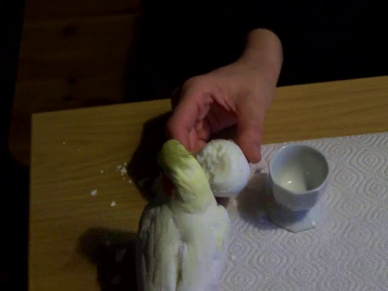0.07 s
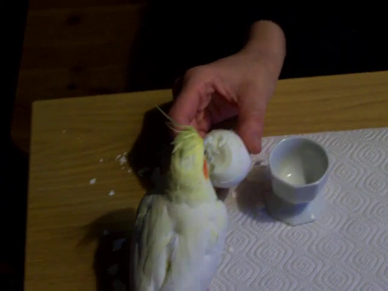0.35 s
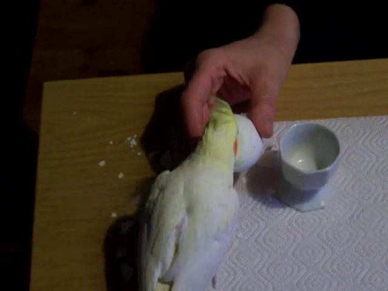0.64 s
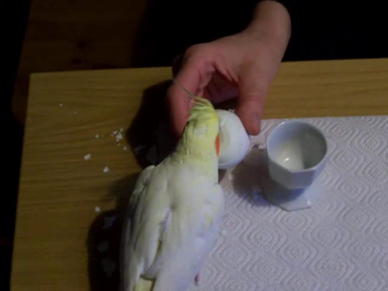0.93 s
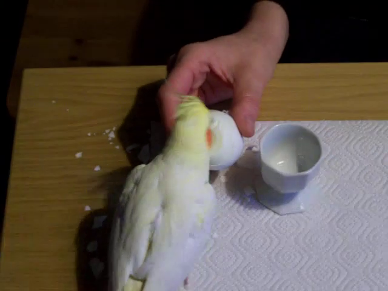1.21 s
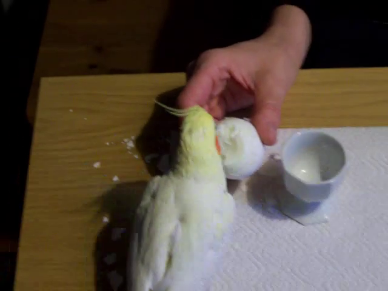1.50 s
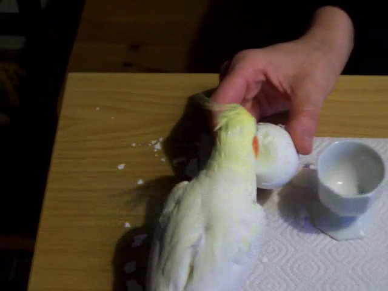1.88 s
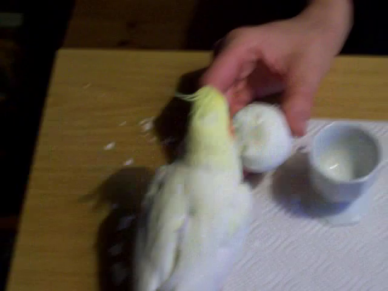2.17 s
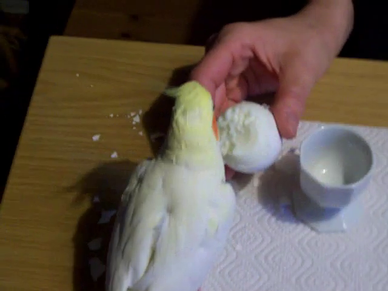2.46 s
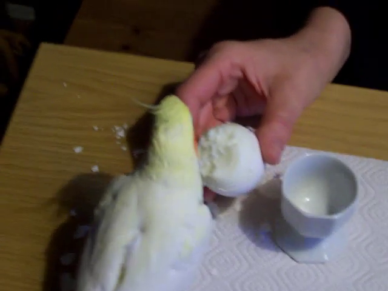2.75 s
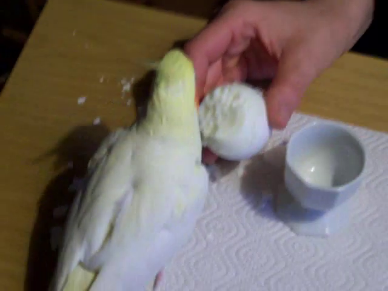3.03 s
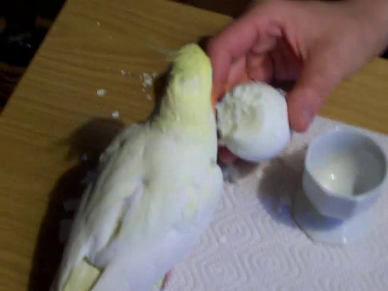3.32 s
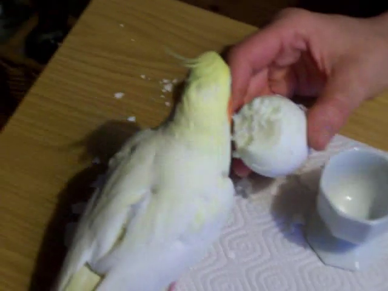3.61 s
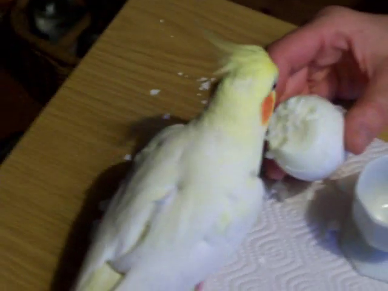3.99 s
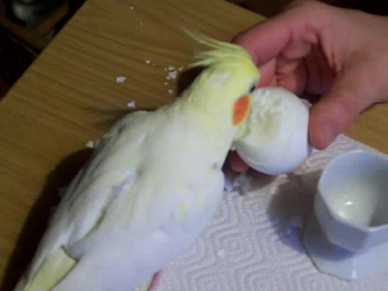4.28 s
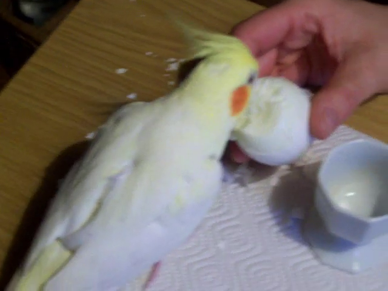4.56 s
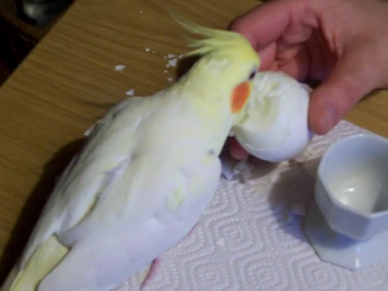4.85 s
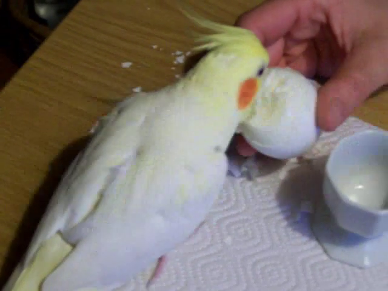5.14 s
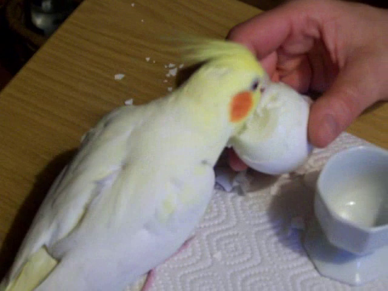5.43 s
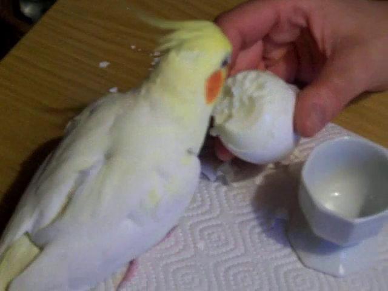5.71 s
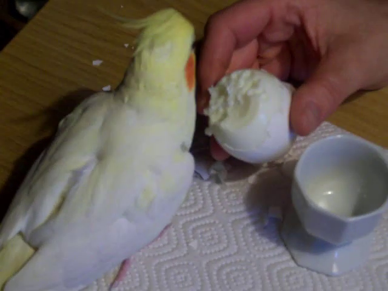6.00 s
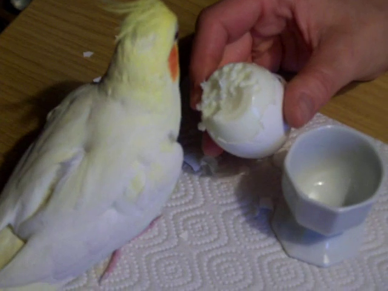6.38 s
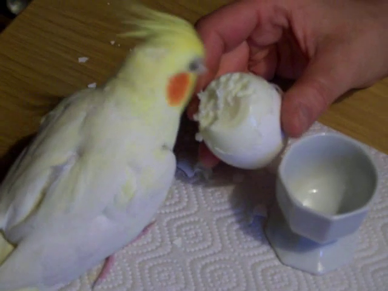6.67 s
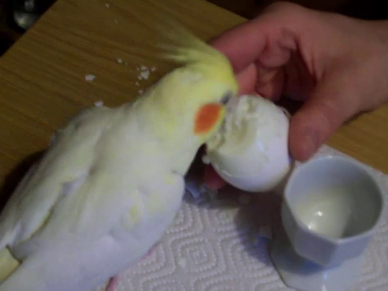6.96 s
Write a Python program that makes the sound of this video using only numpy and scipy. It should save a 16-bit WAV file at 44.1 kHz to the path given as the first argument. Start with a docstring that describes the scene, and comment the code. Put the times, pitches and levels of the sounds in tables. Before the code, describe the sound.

A small parrot nibbles a boiled egg, with faint irregular beak ticks, a few knocks and one sharp shell crack over quiet room hiss.

```python
"""A small parrot nibbles a boiled egg held over a wooden table in a small, quiet room. Under it all lie
room tone and the hiss and thin whine of a camera, whose lens motor whirs for the first two seconds.
The beak bumps the egg and ticks on its shell; then come hollow pops, pecks that knock through to the
table (loudest at 3 s) and soft rubs of feathers and fingers. At 4.2 s the beak slips and clacks shut.
Just after 5 s it grinds along the shell and snaps a bit off; a few faint pecks follow."""
import sys
import numpy as np
from scipy import signal
from scipy.fft import rfft, irfft, next_fast_len
from scipy.io import wavfile
from scipy.ndimage import map_coordinates

SR = 44100
rng = np.random.default_rng(int(sys.argv[2]) if len(sys.argv) > 2 else 0)


def wav_record(signal):
    """Record a signal, one row per channel, as 16-bit PCM in the file named by sys.argv[1]."""
    frames = np.transpose(np.atleast_2d(signal))
    bounded = np.clip(frames, -1, 1)
    # unit amplitude maps onto the largest positive 16-bit level
    quanta = np.round(bounded * 32767).astype(np.int16)
    wavfile.write(sys.argv[1], SR, quanta)


N = 308386
TIME = np.arange(N) / SR
HIT_SAMPLES = 8192
HIT_HZ = np.fft.rfftfreq(HIT_SAMPLES, 1 / SR)
HIT_AGE = np.arange(HIT_SAMPLES) / SR

# colour of the room tone and hiss (frequency [Hz], gain [dB])
AIR_EQ = [(12, -31), (20, -3), (37, -9), (114, -8), (146, -12), (178, -6.5), (340, -8), (405, -4),
          (532, -10), (812, -11.5), (874, -17), (1090, -14.5), (1300, -15.5), (2960, -22), (7600, -23.5),
          (9880, -51), (16700, -120)]
# resonances of the room's hum (frequency [Hz], width [Hz], gain [dB])
HUM_MODES = [(118, 18, -3), (435, 70, -1), (827, 13, -3), (1150, 70, -12), (1299, 18, -3.5),
             (1660, 40, -11), (4610, 90, -11)]
# slow fader ride on the room tone, taken about its mean (time [s], level [dB])
TONE_RIDE = [(0.0, -54), (0.56, -55.5), (1.36, -54), (3.62, -55.5), (4.15, -54), (6.99, -56.5)]
# partials of the electronics' whine (frequency [Hz], relative level [dB])
WHINE_PARTIALS = [(7837, -71), (7867, -72), (7897, -74), (8103, -73), (8133, -71.5), (8163, -71.5)]
# the lens motor hunts for focus (start [s], length [s], level [dB])
FOCUS_RUNS = [(.285, 0.065, -53), (.495, 0.024, -54), (.53, .12, -63.5), (.845, 0.016, -54.5),
              (.945, 0.11, -58.5), (1.185, .16, -57.5), (1.565, 0.152, -54), (1.768, 0.016, -49.5),
              (2.035, 0.059, -56)]
# the lens housing (frequency [Hz], width [Hz], gain [dB])
LENS_MODES = [(1725, 200, -1), (2373, 260, -8.5), (3440, 470, -14.5), (5220, 220, -9), (7180, 280, -14)]
# the blunt side of the beak bumps the egg (time [s], level [dB])
BUMP_CUES = [(0.35, -53), (1.8333, -50.5), (2.4703, -55), (2.946, -50), (3.3264, -50), (3.5293, -44),
             (4.851, -52), (4.949, -41)]
# the beak's tip ticks on a spot of shell (time [s], level [dB], ring [Hz], ring width [Hz])
TICK_CUES = [(0.7215, -50.5, 5200, 3200), (0.8543, -51, 1680, 2200), (1.5678, -49.5, 1870, 2800),
             (1.6464, -46, 1650, 900), (1.8907, -44.5, 3200, 2600), (2.1849, -35, 5500, 5400),
             (2.4701, -56, 1900, 2200), (3.0441, -40.5, 4700, 4000), (3.1404, -47.5, 5030, 2000),
             (3.174, -52, 5000, 4000), (3.288, -47.5, 6500, 1500), (3.3267, -51.5, 3290, 3800),
             (3.5161, -48.5, 1700, 2400), (3.9485, -50.5, 2200, 3400), (4.0796, -53, 3800, 4000),
             (4.1068, -50, 1500, 1500), (4.2303, -52.5, 4600, 3200), (4.4103, -51.5, 1700, 1400),
             (4.6098, -43.5, 3800, 2400), (4.761, -38, 6000, 1400), (4.9744, -47, 4500, 3400),
             (5.001, -45, 4300, 3400), (5.0081, -46.5, 5400, 3800), (5.0308, -49.5, 3000, 2600),
             (5.0567, -39, 3500, 2200), (5.0706, -42, 2000, 1400), (5.0891, -41, 3000, 2000),
             (5.0998, -40.5, 3000, 1600), (5.1123, -40.5, 3070, 1300), (5.1318, -48, 2700, 1300),
             (5.1404, -53, 1700, 1790), (5.3459, -48.5, 1300, 1000), (5.3625, -49, 2600, 1200),
             (6.4195, -48, 1700, 2400), (6.7969, -53.5, 1700, 1400)]
# hollow pops of the beak (time [s], level [dB])
POP_CUES = [(1.8745, -52), (1.8897, -41.5), (4.4902, -53), (4.609, -33)]
# the beak's cavity (frequency [Hz], width [Hz], gain [dB])
CAVITY_MODES = [(2225, 102, 1.5), (4170, 250, -9.5)]
# pecks that reach the table (time [s], level [dB])
KNOCK_CUES = [(1.892, -44.5), (2.164, -46.5), (3.0442, -24), (3.9470, -40.5), (4.952, -48.5), (6.419, -51)]
# the wooden table (frequency [Hz], width [Hz], gain [dB])
TABLE_MODES = [(445, 32, 3), (560, 230, -26), (642, 36, -11), (1104, 72, -16), (1320, 67, -27.5),
               (1756, 50, -18), (1910, 150, -27.5)]
# feathers and fingers rub (start [s], length [s], level [dB])
RUB_CUES = [(2.46, 0.11, -57.5), (2.66, 0.051, -56), (3.06, 0.035, -54), (3.31, 0.12, -58),
            (3.76, 0.091, -60), (4.05, 0.061, -64)]
# colour of the rubbing (frequency [Hz], gain [dB])
FEATHER_EQ = [(200, -31), (900, 4), (2000, -1.5), (5500, 2), (8000, -7.5)]
# the beak clacks shut and rebounds (time [s], level [dB], contact length [s])
CLACK_CUES = [(4.2097, -25, 0.0021), (4.216, -38.5, 0.0026)]
# the beak's two halves (frequency [Hz], width [Hz], gain [dB])
BEAK_MODES = [(434, 270, -17.5), (770, 105, -8.5), (1150, 99, -7.5), (1534, 110, -1), (1810, 160, -0.5),
              (2170, 164, -2), (2400, 180, -6), (2970, 220, -5.5), (3210, 150, -6), (3640, 290, -14)]
# the scraped shell (frequency [Hz], width [Hz], gain [dB])
SCRAPE_MODES = [(260, 140, -3), (1800, 250, 0), (2230, 170, 0), (2800, 220, 0.5), (3500, 260, -6),
                (4230, 87, 1), (5270, 640, -15), (6300, 800, -12.5), (7030, 210, -6.5)]
# the shell breaks (time [s], level [dB], tearing time [s], low-pass cutoff [Hz])
CRACK_CUES = [(5.2718, -19, 0.0034, 8000), (5.2779, -42, 0.0042, 2600), (5.28, -33, 0.00493, 4270),
              (5.3687, -36, 0.004, 3100)]
# the breaking shell (frequency [Hz], width [Hz], gain [dB])
SHELL_MODES = [(367, 580, -13), (675, 160, -3), (1277, 116, -2), (1720, 44, 1), (1960, 81, -1),
               (2250, 126, 2), (2730, 210, -1), (3080, 130, -10), (3370, 190, -4.5), (4140, 250, 6.5),
               (4900, 220, -15), (4810, 170, -7), (6000, 1400, -11), (6920, 770, -9)]
# reverb of the small room (frequency [Hz], time to fall 60 dB [s])
ROOM_DECAY = [(200, 0.93), (2000, 0.31), (8000, 0.3)]
# treble roll-off of the microphone (frequency [Hz], gain [dB])
MIC_EQ = [(7200, 0), (8050, -4), (8400, -14), (8800, -26), (9100, -40)]


def amp(db):
    return 10 ** (np.asarray(db) / 20)


def unit(x):
    return x / np.sqrt(np.mean(x ** 2) + 1e-20)


def along(points, hz):
    """Read a curve of (frequency [Hz], value) points on a log axis."""
    f, v = np.transpose(points)
    return np.interp(np.log(hz + 1), np.log(f + 1), v)


def filtered(x, response):
    """Run a track through a frequency response."""
    size = next_fast_len(N + SR // 2)
    return irfft(rfft(x, size) * response(np.fft.rfftfreq(size, 1 / SR)), size)[:N]


def resonances(modes, f):
    """Response of a bank of resonators with alternating polarity."""
    return sum((-1) ** k * amp(db) * 1j * f * width / (hz * hz - f * f + 1j * f * width)
               for k, (hz, width, db) in enumerate(modes))


def minimum_phase(gain):
    """A filter with this gain curve and no pre-ring."""
    cepstrum = irfft(np.log(np.maximum(gain, 1e-6)))
    cepstrum[1:HIT_SAMPLES // 2] *= 2
    cepstrum[HIT_SAMPLES // 2 + 1:] = 0
    return np.exp(rfft(cepstrum))


def noise(response):
    """Coloured noise of rms 1."""
    return unit(filtered(rng.standard_normal(N), response))


def crackle(per_s):
    """Random clicks of random size."""
    return (rng.random(N) < per_s / SR) * rng.standard_normal(N)


def contact(length_s):
    """Spectrum of a burst of tiny slips: even over frequency, ragged in time."""
    window = np.exp(-(HIT_AGE / max(length_s, 1e-4)) ** 2)
    burst = rng.standard_normal(HIT_SAMPLES) * window
    for _ in range(8):
        whitened = irfft(np.exp(1j * np.angle(rfft(burst))))
        burst = whitened * np.sqrt(window)
    return rfft(burst)


def place(track, time_s, db, hit):
    """Lay in a hit with the energy of 10 ms at this level."""
    start = max(round(time_s * SR), 0)
    hit = amp(db) * hit * np.sqrt(.01 * SR / np.sum(hit ** 2))
    track[start:start + HIT_SAMPLES] += hit[:N - start]


def gate(cues, fade_s):
    """Envelope that fades in and out for each (start [s], length [s], level [dB]) cue."""
    return sum(amp(db) * np.clip(np.minimum(TIME - start, start + length - TIME) / fade_s + .5, 0, 1)
               for start, length, db in cues)


def background():
    """The bed: slowly drifting room tone and hum, steady hiss and the whine of the electronics."""
    times, ride_db = np.transpose(TONE_RIDE)
    drift = amp(np.interp(TIME, times, ride_db) - np.mean(ride_db))
    air = amp(-53) * noise(lambda f: amp(along(AIR_EQ, np.minimum(f, 7000))))  # flat above 7 kHz
    room_tone = filtered(air, lambda f: 1 / (1 + (f / 2000) ** 2))
    hiss = air - room_tone
    hum = amp(-62.5) * noise(lambda f: resonances(HUM_MODES, f))
    whine = sum(amp(db) * np.sin(2 * np.pi * (hz * TIME + rng.random())) for hz, db in WHINE_PARTIALS)
    return hiss + drift * (room_tone + hum) + amp(3) * whine


def lens_whirs():
    """Short runs of the focus motor rattle finely in the lens housing."""
    whir = filtered(crackle(per_s=2500), lambda f: resonances(LENS_MODES, f))
    return gate(FOCUS_RUNS, fade_s=0.011) * unit(whir)


def egg_body(hz=587, width_hz=550):
    """Spectrum of the dead thud of the soft, heavily damped egg."""
    return resonances([(hz, width_hz, 0)], HIT_HZ) ** 2


def egg_bumps():
    """A blunt push thuds in the egg without ringing the shell."""
    out = np.zeros(N)
    for time_s, db in BUMP_CUES:
        place(out, time_s, db, irfft(contact(length_s=.0045) * egg_body()))
    return out


def nibble_cues(per_s=2.8, db=-59.5, spread_db=2, lowest_hz=1480, octaves=2.2):
    """Faint random touches of the beak, in the columns of TICK_CUES."""
    when, size, spot = rng.random((int(per_s * N / SR), 3)).T
    ring_hz = lowest_hz * 2 ** (octaves * spot)
    return list(zip(when * N / SR, db + spread_db * (2 * size - 1), ring_hz, .8 * ring_hz))


def shell_ripple(depth_db=3.0, spacing_hz=331.4):
    """Random peaks and dips: every spot on the shell has its own resonances."""
    knots = rng.standard_normal(128)
    return amp(depth_db * map_coordinates(knots, [HIT_HZ / spacing_hz], mode="mirror"))


def shell_ticks(chatter_db=1.5, chatter_t60_s=.035, chatter_cutoff_hz=2100):
    """The beak's tip touches and chatters, ringing a spot of shell and nudging the egg."""
    out = np.zeros(N)
    for time_s, db, ring_hz, width_hz in TICK_CUES + nibble_cues():
        brightness = ring_hz / 2000
        contact_s = 0.0044 / brightness ** .6  # brighter ticks are shorter
        thud_db = db - 5.5 - 9 * np.log2(brightness)  # and push the egg less
        slips = rfft(unit(irfft(contact(contact_s))))
        rattle = unit(rng.standard_normal(HIT_SAMPLES) * amp(-60 * HIT_AGE / chatter_t60_s))
        chatter = rfft(rattle) / (1 + 1j * HIT_HZ / chatter_cutoff_hz)
        touch = slips + amp(chatter_db) * chatter
        colour = np.abs(resonances([(ring_hz, width_hz, 0)], HIT_HZ)) * shell_ripple()
        place(out, time_s, db, irfft(touch * minimum_phase(colour)))
        place(out, time_s, thud_db, irfft(touch * egg_body()))
    return out


def beak_pops(attack_s=0.0013):
    """The beak parts and its cavity swells into a brief, hollow note."""
    out = np.zeros(N)
    swell = (1 - np.exp(-HIT_AGE / attack_s)) ** 2
    for time_s, db in POP_CUES:
        place(out, time_s, db, irfft(resonances(CAVITY_MODES, HIT_HZ)) * swell)
    return out


def table_knocks():
    """A peck carries through and rings the wood of the table."""
    out = np.zeros(N)
    for time_s, db in KNOCK_CUES:
        place(out, time_s, db, irfft(contact(length_s=0.0011) * resonances(TABLE_MODES, HIT_HZ)))
    return out


def feather_rubs():
    """Fibres catch and slip as the bird and the hand shift."""
    rustle = filtered(crackle(per_s=1500), lambda f: amp(along(FEATHER_EQ, f)))
    return gate(RUB_CUES, fade_s=0.013) * unit(rustle)


def beak_clacks():
    """The beak slips off the egg and its halves meet with a hollow clack."""
    out = np.zeros(N)
    for time_s, db, contact_s in CLACK_CUES:
        place(out, time_s, db, irfft(contact(contact_s) * resonances(BEAK_MODES, HIT_HZ)))
    return out


def shell_grind(peak_s=5.1, peak_db=-44, hold_s=.12, grain_spread_db=3.5):
    """Tiny fractures under the sliding beak: pressure builds fast, sags as the shell gives, lets go."""
    fractures = crackle(per_s=2000) * amp(grain_spread_db * rng.standard_normal(N))
    crunch = unit(filtered(fractures, lambda f: resonances(SCRAPE_MODES, f)))
    age = TIME - peak_s
    attack_db = 300 * np.minimum(age, 0)  # slopes in dB per second
    sag_db = -40 * np.maximum(age, 0)
    release_db = -298 * np.maximum(age - hold_s, 0)
    return amp(peak_db + attack_db + sag_db + release_db) * crunch


def shell_cracks():
    """A tear runs through the shell in a few ms and rings it; a blunter bite is duller."""
    out = np.zeros(N)
    for time_s, db, tear_s, cutoff_hz in CRACK_CUES:
        bite = minimum_phase(1 / np.sqrt(1 + (HIT_HZ / cutoff_hz) ** 6))
        place(out, time_s, db, irfft(contact(tear_s) * bite * resonances(SHELL_MODES, HIT_HZ)))
    return out


def room_reverb(send):
    """The walls answer with a diffuse tail whose lows hang on longest."""
    hz, age, bands = signal.stft(rng.standard_normal(SR // 2), SR, nperseg=256)
    decay = amp(-60 * age / along(ROOM_DECAY, hz)[:, None])
    tail = signal.istft(bands * decay, SR, nperseg=256)[1]
    tail = np.pad(tail, (SR // 200, 0))  # 5 ms pre-delay
    return signal.fftconvolve(send, tail / np.linalg.norm(tail))[:N]


def scene():
    """Mono mix: the bird is close and nearly dry; its pops get the biggest reverb send."""
    foley = (shell_ticks() + egg_bumps() + shell_cracks() + beak_clacks() + table_knocks()
             + shell_grind() + feather_rubs())
    pops = beak_pops()
    reverb = room_reverb(amp(-31.0) * foley + amp(-13.5) * pops)
    return (foley + pops + reverb + lens_whirs() + background())[None]


def record(dry):
    """The camera's microphone rolls off the treble, up to a hard band limit."""
    limit_hz = 9082
    return filtered(dry[0], lambda f: amp(along(MIC_EQ, f)) * (f < limit_hz))[None]


dry = scene()
out = record(dry)
wav_record(out)
```